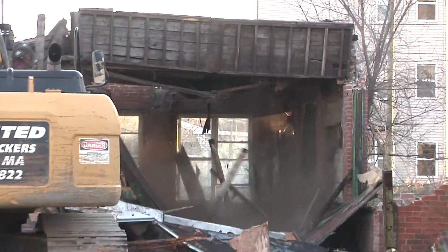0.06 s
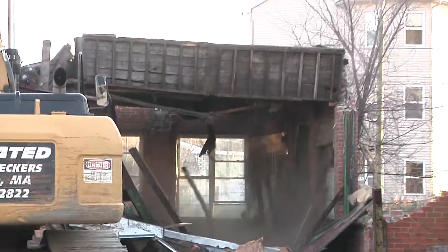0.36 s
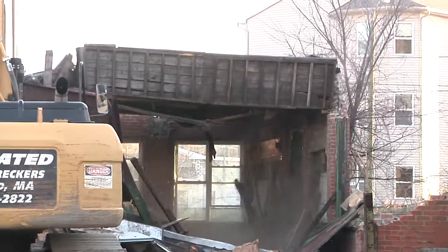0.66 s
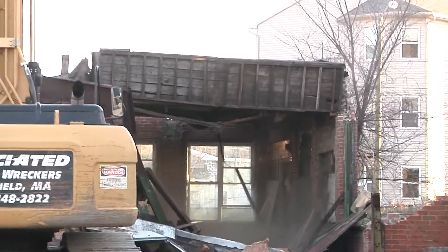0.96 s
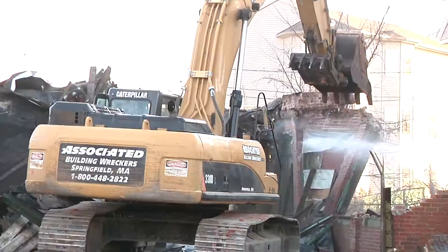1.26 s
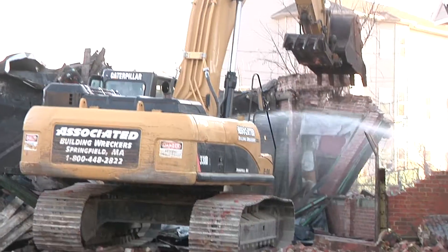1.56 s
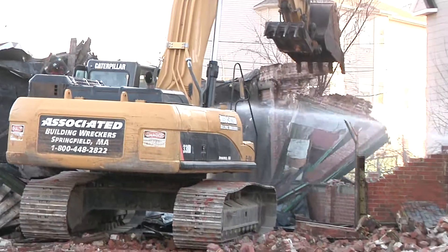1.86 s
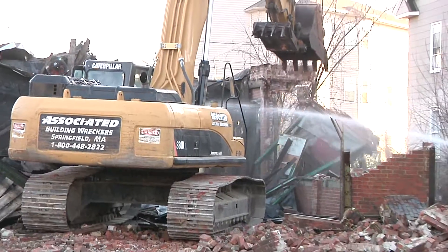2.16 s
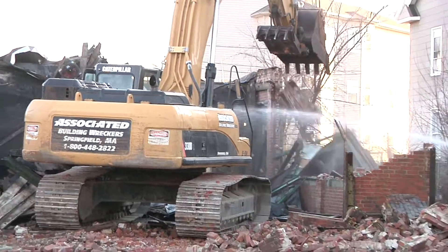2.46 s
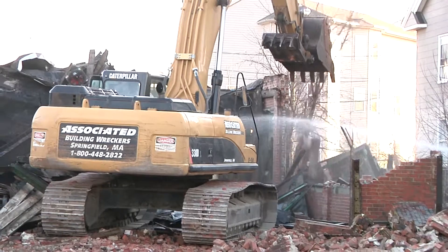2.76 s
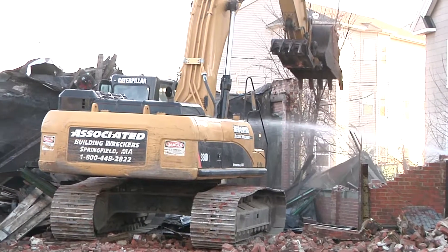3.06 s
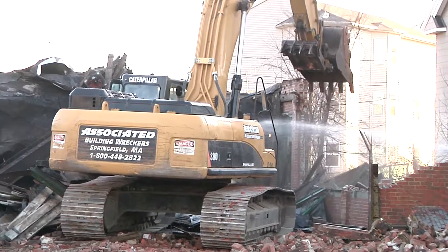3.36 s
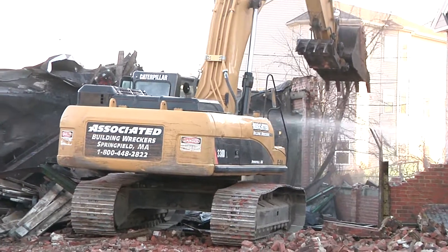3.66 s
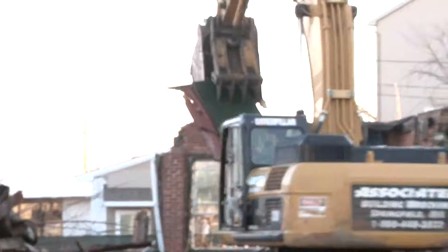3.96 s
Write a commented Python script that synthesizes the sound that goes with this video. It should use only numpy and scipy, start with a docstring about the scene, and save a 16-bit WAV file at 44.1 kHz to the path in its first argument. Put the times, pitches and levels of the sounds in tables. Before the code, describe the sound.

Wood and brick crack and tumble over the steady drone of an excavator's diesel engine.

```python
"""Excavator tearing down a building

A six-cylinder diesel drones while a hose sprays the dust and wind bumps the microphone. Timbers tumble inside
the shell; the sound steps abruptly with a sharp click, then a brick wall cracks and crashes. The debris is a
swarm of small ringing impacts, with thuds and sharp snaps on top. Grit trickles after the falls, and nearby
houses throw the collapse back."""
import sys
import numpy as np
from scipy import signal
from scipy.fft import rfft, irfft
from scipy.io import wavfile
from scipy.ndimage import uniform_filter1d

SR = 44100
rng = np.random.default_rng(int(sys.argv[2]) if len(sys.argv) > 2 else 0)


def master(y):
    """Save y as 16-bit WAV."""
    cut = np.clip(np.atleast_2d(y).T, -1, 1)
    pcm = np.round(cut * 32767)  # scale
    wavfile.write(sys.argv[1], SR, pcm.astype(np.int16))


N = 176400
T, HZ = np.arange(N) / SR, np.fft.rfftfreq(N, 1 / SR)
SHIFT_S = 1.118  # the hiss steps down and the exhaust changes colour

# wind gusts (time [s], level [dB])
GUST_LEVEL = [(0, -23.5), (2.15, -16.5), (3.35, -19.5), (3.46, -17.5), (3.7, -22)]
# wind rumble (frequency [Hz], relative level [dB])
WIND_EQ = [(5, -2), (26, 5.5), (50, -4.5), (110, -3.5), (1000, -85)]
# water spray (frequency [Hz], relative level [dB])
SPRAY_EQ = [(500, -27), (3000, 0), (15000, -21)]
# engine speed (time [s], firing rate [Hz])
FIRING_RATE = [(0, 95.4), (1.0, 95.6), (1.33, 99), (1.55, 98.0), (4, 100)]
# exhaust fundamental (time [s], level [dB])
EXHAUST_LEVEL = [(0, -14), (1.2, -12), (1.41, -20), (1.75, -14.5)]
# exhaust partials (pitch [x firing rate], base level before the shift [dB], base level after [dB])
EXHAUST_PARTIALS = [(1 / 3, -33, -24), (2, -22.5, -22.5), (3, -30, -35.5), (6, -36.5, -39.5)]
# casing and fan noise (frequency [Hz], relative level [dB])
CASING_EQ = [(20, -25), (60, 3.5), (240, 0), (360, -10), (580, -6.5), (1000, -12), (2000, -17.5),
             (4500, -28.5), (6500, -39.5), (15000, -54)]
# bright chips landing (time [s], level [dB])
CHIP_HITS = [(.778, -37), (2.812, -29.5), (3.95, -41)]
# spills of grit (time [s], level [dB], length [s])
GRIT_SPILLS = [(0.178, -39, 0.021), (0.859, -34.5, 0.035), (1.68, -30, 0.0081), (1.954, -31.5, 0.0091),
               (2.045, -30.5, 0.03), (2.416, -35.5, 0.039), (2.565, -38, 0.062), (2.67, -37, 0.059),
               (2.806, -30.5, 0.076), (2.935, -32.5, 0.12), (3.09, -37.5, 0.05), (3.21, -41.5, 0.12),
               (3.648, -40, 0.013)]
# grit sizzle (frequency [Hz], relative level [dB])
GRIT_EQ = [(800, -23), (3500, 16.5), (15000, -3)]
# tumbling timber (time [s], level [dB])
TIMBER_LEVEL = [(0, -22), (.6, -22), (1.0, -24.5), (1.75, -40.5), (1.89, -21), (2.1, -33), (2.9, -27),
                (4, -33.5)]
# woody clatter (frequency [Hz], relative level [dB])
TIMBER_EQ = [(60, -16), (220, -3.5), (500, 2), (1800, -13.5), (15000, -50.5)]
# sliding brick rubble (time [s], level [dB])
RUBBLE_LEVEL = [(0, -25.5), (.75, -34.5), (.9, -27.5), (1.25, -38), (2.07, -27.5), (2.29, -35.5),
                (2.44, -23), (2.54, -28), (2.84, -22.5), (3.4, -30), (4, -39)]
# brick clatter (frequency [Hz], relative level [dB])
RUBBLE_EQ = [(150, -24), (500, -7), (1500, 1), (3400, -7), (15000, -53.5)]
# beams landing, plus one low bump of wind on the microphone at 2.7 s
# (time [s], relative level [dB], ring pitch [Hz])
THUD_HITS = [(.036, -14.5, 630), (.638, -15, 720), (.868, -14, 724), (1.681, -14, 546), (1.778, -13.5, 420),
             (1.793, -13, 500), (2.06, -14.5, 463), (2.695, -9, 125)]
# body of a thud (frequency [x ring pitch], relative level [dB])
THUD_EQ = [(.2, -7.5), (.62, -4), (1.15, 5), (1.6, -15), (25, -36)]
# wood and brick snapping (time [s], relative level [dB], ring pitch [Hz], splinter length [s])
CRACK_HITS = [(.022, -18.5, 1400, .024), (.185, -23, 2900, .005), (.201, -19.5, 3400, .006),
              (.319, -22, 3100, .012), (.435, -23, 1350, .14), (.554, -24.5, 4200, .006),
              (.866, -19, 2100, .01), (.976, -17, 1150, .005), (1.019, -22.5, 3700, .005),
              (1.681, -20, 2900, .006), (1.715, -16, 1950, .005), (1.792, -19, 2600, .005),
              (1.872, -23, 2500, .009), (2.022, -20.5, 1300, .015), (2.081, -17, 1700, .009),
              (2.338, -14, 2600, .006), (2.753, -17.5, 3900, .007), (2.895, -12.5, 1950, .005),
              (2.941, -14, 1900, .017), (3.003, -18.5, 2300, .018), (3.082, -14.5, 1500, .003),
              (3.104, -16.5, 1350, .016), (3.216, -15.5, 1750, .014), (3.385, -19, 3000, .004),
              (3.418, -13, 2600, .004), (3.647, -20.5, 2200, .008)]
# bite of a crack (frequency [x ring pitch], relative level [dB])
CRACK_EQ = [(.1, -16), (.55, -6), (.85, 0), (1.13, 1), (1.45, -7.5), (8, -35)]


def amp(db):
    """Decibels to gain."""
    return 10 ** (np.asarray(db) / 20)


def unit(x):
    """Scales to rms 1."""
    return x / np.sqrt(np.mean(x ** 2) + 1e-20)


def curve(points):
    """An automation curve through (time, value) points."""
    return np.interp(T, *np.transpose(points))


def colour(x, points, base_hz=1):
    """Minimum-phase EQ through (frequency, level) points; the result has rms 1."""
    freqs, db = np.transpose(points)
    bin_hz = abs(np.fft.fftfreq(len(x), 1 / SR))
    log_gain = np.log(amp(np.interp(np.log(bin_hz + 1), np.log(freqs * base_hz), db)))
    response = np.exp(np.conj(signal.hilbert(log_gain)))[:len(x) // 2 + 1]
    return unit(irfft(rfft(x) * response, len(x)))


def band(x, hz, q=2):
    """A broad resonance; the result has rms 1."""
    return unit(signal.lfilter(*signal.iirpeak(hz, q, fs=SR), x))


def wander(rate_hz):
    """Smooth random modulation of rms 1."""
    return unit(irfft(rfft(rng.standard_normal(N)) / (1 + (HZ / rate_hz) ** 4), N))


def add(mix, start_s, sound):
    """Drops a sound into the mix."""
    part = mix[max(round(start_s * SR), 0):][:len(sound)]
    part += sound[:len(part)]


def shift(before_db, after_db):
    """Gain that steps at SHIFT_S."""
    return amp(np.where(T < SHIFT_S, before_db, after_db))


def wind():
    """Gusts buffet the microphone with a low rumble."""
    return amp(curve(GUST_LEVEL)) * colour(rng.standard_normal(N), WIND_EQ)


def hose():
    """The water jet lays down a fluttering bed of hiss."""
    return amp(-45.5 + wander(25)) * shift(5.5, 0) * colour(rng.standard_normal(N), SPRAY_EQ)


def engine(flutter=0.061, throb=0.12, partial_follow=0.62, fan_hz=125.6):
    """Exhaust tones on the firing rate, a fan hum, and casing noise that throbs with the crankshaft."""
    phase = 2 * np.pi * np.cumsum(curve(FIRING_RATE) * (1 + 0.0053 * wander(14.6))) / SR
    level_db = curve(EXHAUST_LEVEL)
    drone = amp(level_db) * (1 + flutter * wander(10)) * np.cos(phase)
    partials = sum(shift(before_db, after_db) * (1 + flutter * wander(8.1)) * np.cos(ratio * phase)
                   for ratio, before_db, after_db in EXHAUST_PARTIALS)
    partials *= amp(partial_follow * (level_db - level_db.mean()))
    fan_level = amp(-25) * (1 + 0.28 * wander(3.4))
    fan = fan_level * np.cos(2 * np.pi * np.cumsum(fan_hz * (1 + 0.0066 * wander(4.8))) / SR)
    crank = 1 + throb * np.cos(phase / 3)  # three firings per turn
    casing = amp(-22) * colour(rng.standard_normal(N) * crank, CASING_EQ)
    return np.sqrt(2) * (drone + partials + fan) + casing


def yard(x, t60_s=0.56, wet_db=-7.5, treble_hz=4450, echoes_per_s=1500, predelay_s=0.008):
    """Adds scattered, darkened echoes from the walls around the site."""
    t = T[:SR // 2]
    taps = rng.standard_normal(len(t)) * (rng.random(len(t)) < echoes_per_s / SR)
    taps *= amp(-60 * t / t60_s) * (t > predelay_s)
    tail = signal.lfilter(*signal.butter(1, treble_hz, fs=SR), taps / np.linalg.norm(taps))
    return x + amp(wet_db) * signal.fftconvolve(x, tail)[:N]


def click(decay_s=0.00006):
    """One sharp click sounds as the hiss and engine tone step abruptly."""
    out = np.zeros(N)
    add(out, SHIFT_S, amp(-4.5) * np.exp(-T[:256] / decay_s))
    return out


def high_hiss(peak_s=3.572, half_length_s=0.05, hz=7900):
    """A narrow hiss swells and fades once as the rubble settles."""
    swell = np.exp(-((T - peak_s) / half_length_s) ** 4)
    return amp(-47) * swell * band(band(rng.standard_normal(N), hz), hz)


def chips(hz=11300, decay_s=0.0055):
    """Single hard splinters land with a thin, bright tick."""
    out, t = np.zeros(N), T[:1024]
    for start_s, db in CHIP_HITS:
        add(out, start_s, amp(db) * np.exp(-t / decay_s) * band(rng.standard_normal(len(t)), hz))
    return out


def grit(attack_share=0.042, under_rubble_db=-17, grains_per_s=11000, spread_db=3.5):
    """Uneven ticks of mortar and glass pour with the rubble and shower down in spills."""
    level = amp(curve(RUBBLE_LEVEL) + under_rubble_db)
    for start_s, db, length_s in GRIT_SPILLS:
        age = T[:SR] / length_s
        add(level, start_s, amp(db) * (1 - np.exp(-age / attack_share)) * np.exp(-age ** 2 / 2))
    grains = (rng.random(N) < grains_per_s / SR) * rng.choice([-1, 1], N)
    sizes = amp(spread_db * np.minimum(rng.exponential(1, N), 5))
    return level * colour(grains * sizes, GRIT_EQ)


def fragments(hits_per_s, spread_db, decay_cycles, low_hz, high_hz, pieces=36):
    """Random impacts of uneven size on many pieces, each ringing briefly in three modes."""
    out, t = np.zeros(N), T[:2048]
    for hz in np.geomspace(low_hz, high_hz, pieces):
        strikes = rng.random(N) < hits_per_s / pieces / SR
        sizes = amp(spread_db * np.minimum(rng.exponential(1, N), 3.5))
        hits = strikes * sizes * rng.choice([-1, 1], N)
        mode_hz = hz * np.array([1, rng.uniform(1.31, 2.006), rng.uniform(2.04, 3.4)])[:, None]
        envelopes = np.sqrt(mode_hz / hz) * np.exp(-t * mode_hz / decay_cycles)
        ring = (envelopes * np.sin(2 * np.pi * mode_hz * t)).sum(0)
        out += np.sqrt(hz) * unit(signal.oaconvolve(hits, ring)[:N])
    spectrum = rfft(out)
    contour = np.sqrt(uniform_filter1d(abs(spectrum) ** 2, size=801) + 1e-6)
    return unit(irfft(spectrum / contour, N))  # flattened, ready for EQ


def debris(timber_clump_db=1.5, rubble_clump_db=2.0):
    """Boards and bricks tumble in clumps."""
    boards = fragments(hits_per_s=1200, spread_db=1.9, decay_cycles=10.6, low_hz=258.3, high_hz=3047)
    bricks = fragments(hits_per_s=900, spread_db=1.5, decay_cycles=7.8, low_hz=704.3, high_hz=4470)
    timber = amp(curve(TIMBER_LEVEL) + timber_clump_db * wander(31)) * colour(boards, TIMBER_EQ)
    rubble = amp(curve(RUBBLE_LEVEL) + rubble_clump_db * wander(20)) * colour(bricks, RUBBLE_EQ)
    return timber + rubble


def blows(hits, eq, contacts_per_s, attack_share=0.1, top_hz=4370):
    """Each blow is a quick volley of contacts, coloured around its ring pitch and dulled on top."""
    out, t = np.zeros(N), T[:8192]
    for start_s, db, ring_hz, length_s in hits:
        contacts = rng.choice([-1, 1], len(t)) * ((rng.random(len(t)) < contacts_per_s / SR) | (t == 0))
        age = t / length_s
        volley = contacts * (1 - np.exp(-age / attack_share)) * np.exp(-age ** 0.95)
        add(out, start_s, amp(db) * np.sqrt(length_s / t[-1]) * colour(volley, eq, ring_hz))
    return signal.lfilter(*signal.butter(4, top_hz, fs=SR), out)


def thuds(length_s=0.0075):
    """Short, heavy knocks of beams, plus one low bump of wind on the microphone at 2.7 s."""
    return blows([(*hit, length_s) for hit in THUD_HITS], THUD_EQ, contacts_per_s=2300)


def cracks():
    """Wood and brick snap in dense bursts of splintering that ring the broken piece."""
    return blows(CRACK_HITS, CRACK_EQ, contacts_per_s=4000)


def scene():
    """The collapse with its echoes, over a dry bed of machine, hose and wind."""
    impacts = thuds() + cracks() + debris() + grit() + chips()
    return (yard(impacts) + engine() + hose() + high_hiss() + wind() + click())[None]


def record(dry, fade_s=0.004, top_hz=14900):
    """Master chain: soft clip, a quick fade at each end, and a steep low-pass."""
    rounded = dry / (1 + dry ** 8) ** (1 / 8)
    fades = np.minimum(np.minimum(T, T[::-1]) / fade_s, 1)
    lowpass = signal.firwin(401, top_hz, window=("kaiser", 9), fs=SR)
    return signal.oaconvolve(rounded * fades, lowpass[None], "same")


dry = scene()
out = record(dry)
master(out)
```